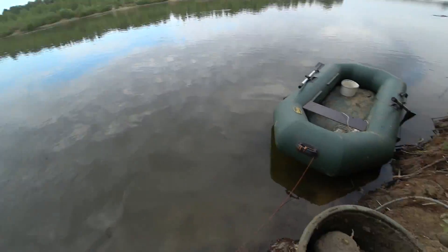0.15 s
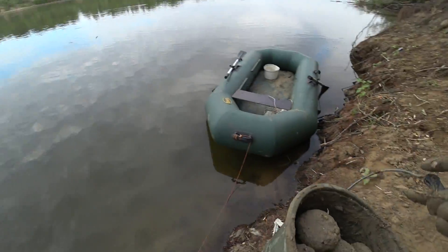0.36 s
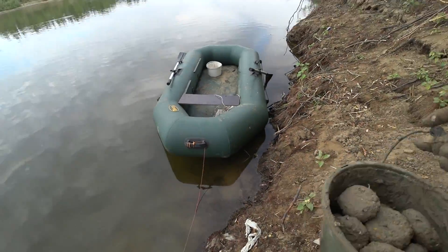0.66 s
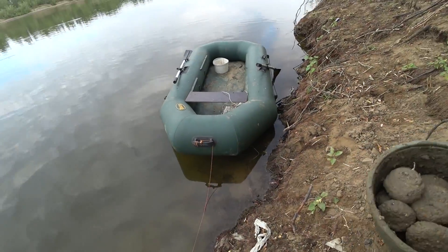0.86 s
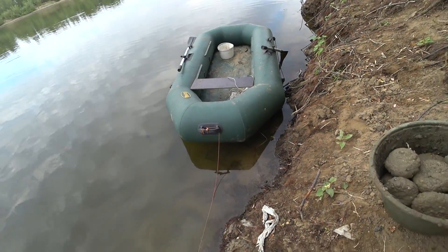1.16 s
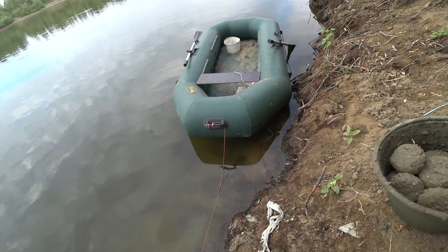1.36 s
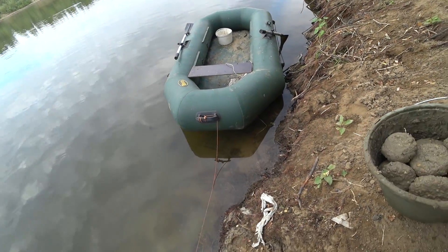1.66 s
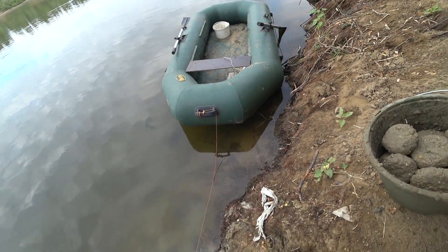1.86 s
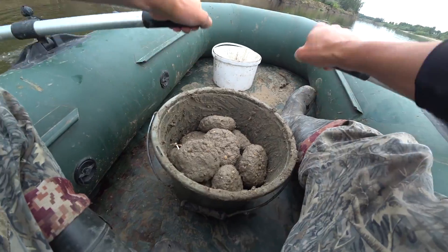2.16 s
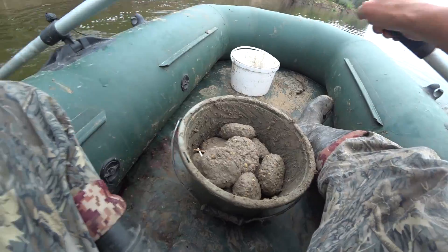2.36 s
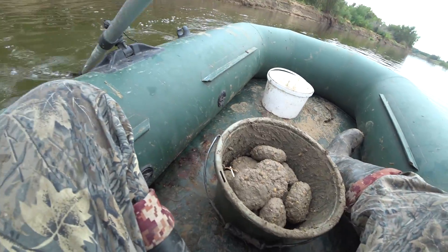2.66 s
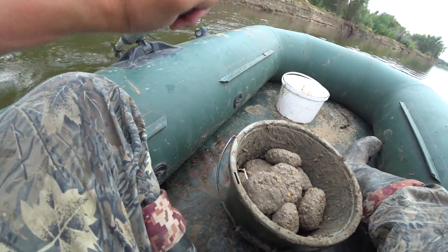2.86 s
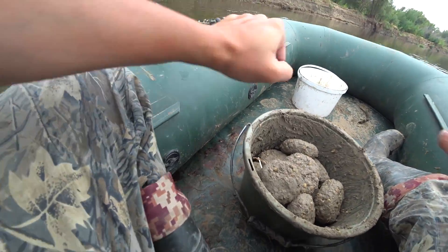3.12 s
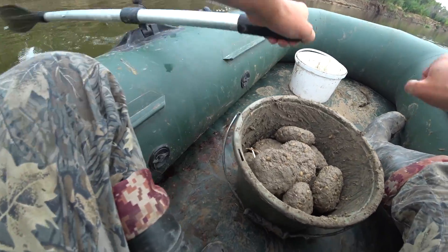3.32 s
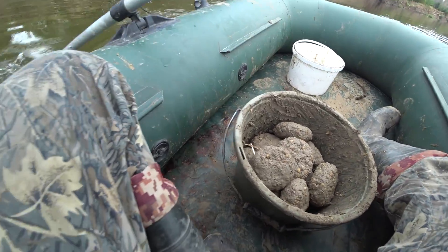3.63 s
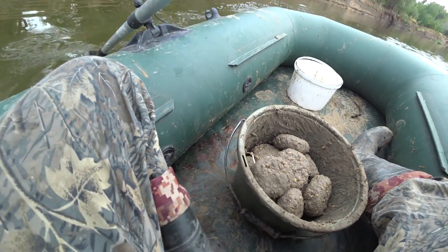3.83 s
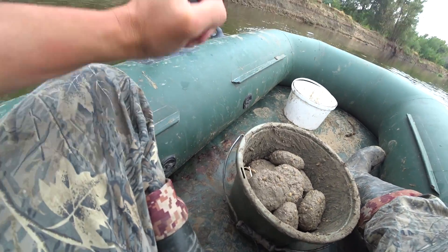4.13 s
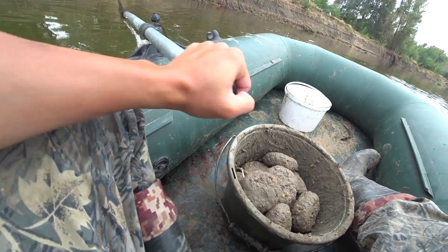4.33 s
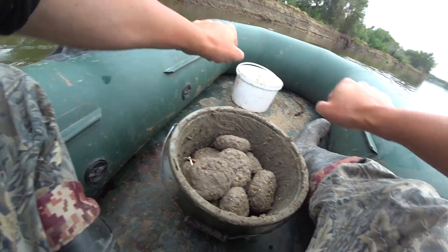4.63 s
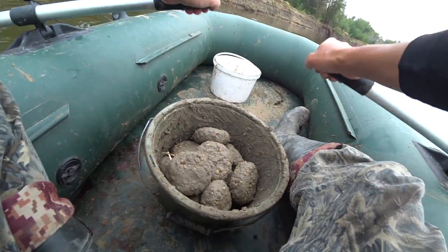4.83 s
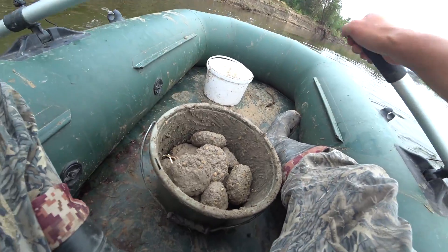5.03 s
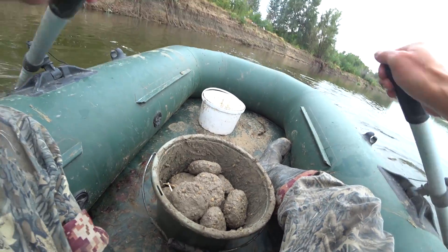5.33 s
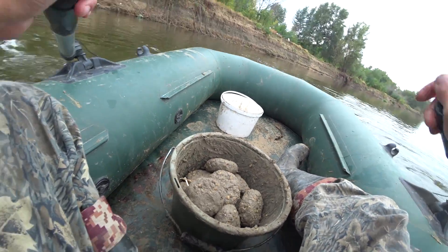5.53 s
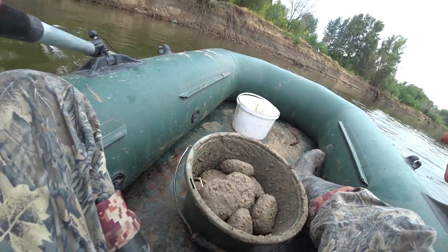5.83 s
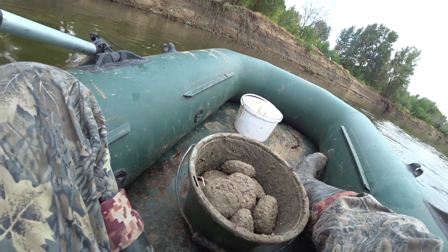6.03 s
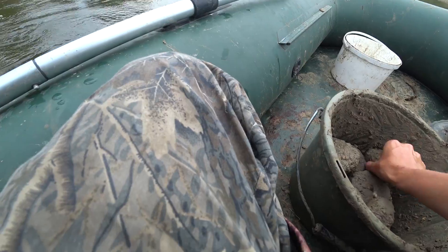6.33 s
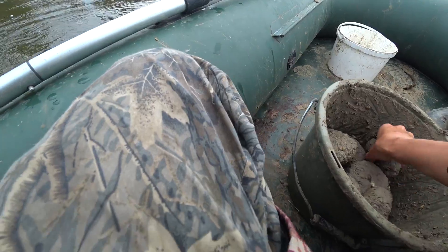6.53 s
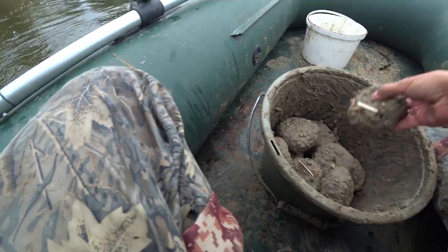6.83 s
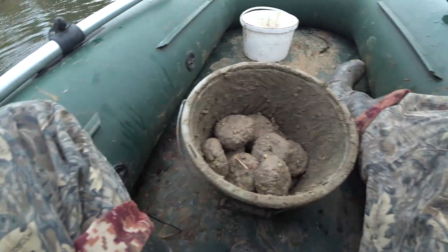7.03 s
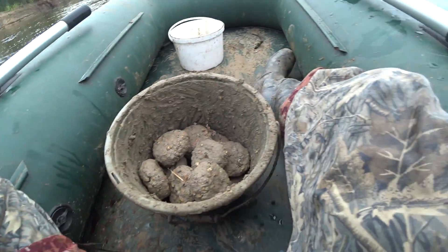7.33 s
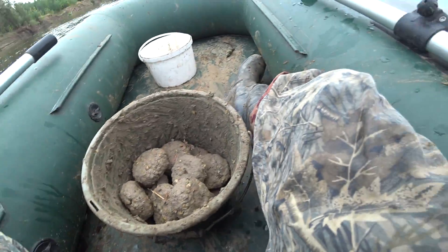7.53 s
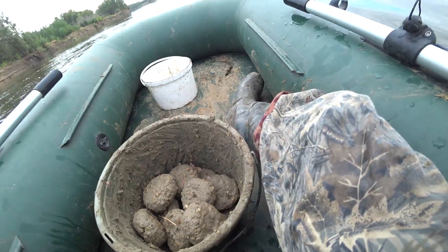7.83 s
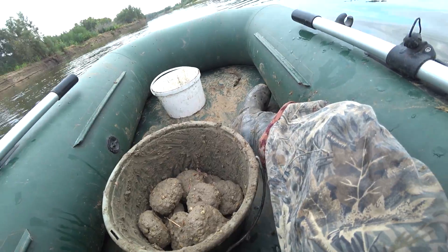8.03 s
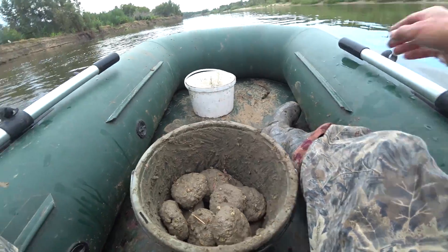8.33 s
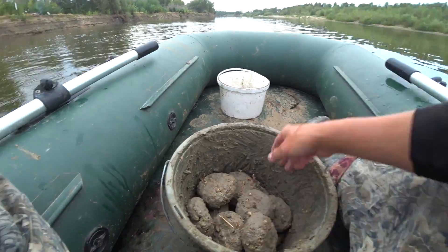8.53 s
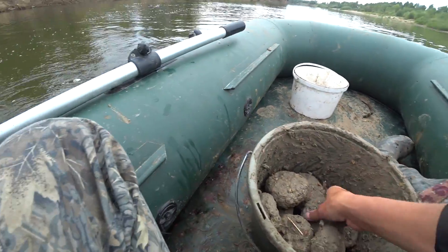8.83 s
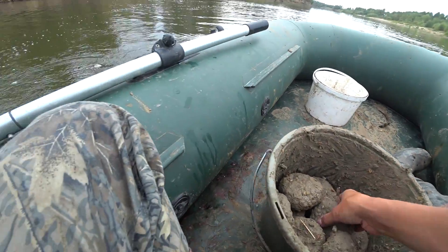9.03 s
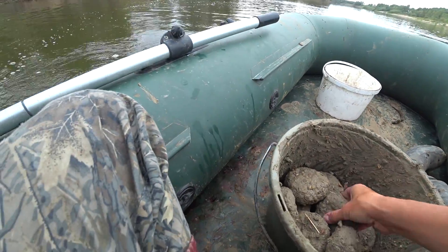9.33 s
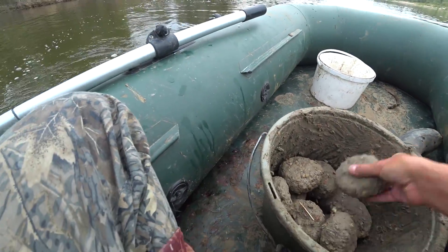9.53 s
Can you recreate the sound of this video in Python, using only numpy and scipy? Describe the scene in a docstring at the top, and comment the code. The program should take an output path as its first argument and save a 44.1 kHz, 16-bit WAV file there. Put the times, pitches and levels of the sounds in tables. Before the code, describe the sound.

A bait bucket knocks and scrapes on a quiet riverbank, then oars splash, gurgle and knock in a booming rubber boat.

```python
"""Oar blades splash and gurgle close by: shaped noise and swarms of tiny chirps swell with each stir.
It begins on a quiet bank, where a bait bucket is knocked and scraped, and goes on in a rubber boat.
Big bubbles are rising tones; drops and stiff cloth tick as very short rings with a snap of noise.
The aluminium oars ring and rattle in their locks, and the air-filled hull booms in low, damped tones.
Filtered noise makes the water under the floor, the rumble of wind and hull, the far river and the hiss."""
import sys
import numpy as np
from scipy import signal
from scipy.fft import rfft, irfft, next_fast_len
from scipy.io import wavfile
from scipy.ndimage import map_coordinates

SR = 44100
rng = np.random.default_rng(int(sys.argv[2]) if len(sys.argv) > 2 else 0)


def master(y):
    """Save y as 16-bit WAV."""
    cut = np.clip(np.atleast_2d(y).T, -1, 1)
    pcm = np.round(cut * 32767)  # scale
    wavfile.write(sys.argv[1], SR, pcm.astype(np.int16))


N = 426447  # length in samples


def amp(db):
    """Turn decibels into a plain multiplier."""
    return 10 ** (np.asarray(db) / 20)


def unit(x):
    """Scale a sound to an rms of 1."""
    return x / np.sqrt(np.mean(x ** 2) + 1e-20)


def along(points, hz):
    """Read a curve of (Hz, value) points on a log frequency axis."""
    f, value = np.transpose(points)
    return np.interp(np.log(hz + 1), np.log(f + 1), value)


def curves(rows):
    """Give one value per sample for each column after the time."""
    s, *columns = np.transpose(rows)
    return [np.interp(np.arange(N) / SR, s, column) for column in columns]


def wobble(rate):
    """A smooth random curve with so many random points a second."""
    points = rng.standard_normal(int(N * rate / SR) + 4)
    return map_coordinates(points, [np.arange(N) * rate / SR])


def between(span):
    """1 inside the (start, end) span in seconds, 0 outside, with soft edges."""
    t = np.arange(N) / SR
    return np.clip(np.minimum(t - span[0], span[1] - t) / 0.0039, 0, 1)


def filtered(x, response):
    """Multiply the spectrum of x by a function of frequency."""
    size = next_fast_len(N + 8192)
    return irfft(rfft(x, size) * response(np.fft.rfftfreq(size, 1 / SR)), size)[..., :N]


# How alike the two ears sound: f/Hz, likeness (1 = the same, 0 = unrelated)
EAR_LIKENESS = [(30, 0.88), (250, 0.94), (800, 0.08), (4000, 0.39), (10000, 0.72)]


def rush(spectrum):
    """Stereo noise of rms 1 with a given spectrum; the ears' likeness depends on frequency."""
    def mid_and_side(hz):
        turn = np.arccos(np.clip(along(EAR_LIKENESS, hz), -1, 1)) / 2
        return amp(along(spectrum, hz)) * [np.cos(turn), np.sin(turn)]
    mid, side = filtered(rng.standard_normal((2, N)), mid_and_side)
    return unit(np.array([mid + side, mid - side]))


def add(track, s, sound, side_db=0):
    """Lay a sound on the stereo track; the far ear hears it weaker and later."""
    for ear, sign in zip(track, (1, -1)):
        delay = max(0, -.3 * sign * side_db)  # samples
        part = ear[round(s * SR + delay):][:len(sound)]
        part += amp(sign * side_db / 2) * sound[:len(part)]


def ring(t, hz, t60, rise_ms):
    """A damped tone with a soft start; t60 is the time in s to fade by 60 dB."""
    return np.sin(2 * np.pi * hz * t) * amp(-60 * t / t60) * (1 - np.exp(-t * 1000 / rise_ms))


def puff(t, lo_hz, hi_hz, t60):
    """A burst of band noise that dies away."""
    hz = np.fft.rfftfreq(len(t), 1 / SR) + 1
    band = 1 / (1 + (lo_hz / hz) ** 3) / (1 + (hz / hi_hz) ** 3)
    noise = irfft(rfft(rng.standard_normal(len(t))) * band, len(t))
    return unit(noise) * amp(-60 * t / t60)


def grains(count, size, hz, spread, cycles, climb, scatter_db, wide_db):
    """Random damped sines whose pitch climbs, each on its own side; rms 1."""
    at = rng.random((count, 1))
    big = np.minimum(rng.exponential(size=(count, 1)), 4.5)
    pitch, side = rng.standard_normal((2, count, 1))
    n = np.arange(size)
    turns = np.clip(hz * np.exp(spread * pitch), 300, 14000) * n / SR
    u = turns / cycles
    tone = np.sin(2 * np.pi * turns * (1 + climb * u))
    wave = amp(scatter_db * big) * tone * u * np.exp(-3 * u) * (1 - n / size)
    ears = []
    for sign in (1, -1):
        where = (at * N + np.maximum(0, -1.4 * sign * side)).astype(int) + n  # one ear hears it later
        loud = wave * amp(sign * wide_db * side)
        ears.append(np.bincount(where.ravel(), loud.ravel(), N)[:N])
    return unit(np.array(ears))


# Side of the nearest stir: t/s, left minus right level/dB
SIDE = [(0, 0), (1, -4), (2, -3), (2.4, 3), (2.7, -4), (3.3, -1), (3.6, 3), (4.06, -4), (4.5, 1), (4.97, 3),
        (5.1, -4), (6, 0), (7.8, -2), (8, -5.5), (8.3, -5.5), (8.6, 0), (9.67, -2)]


def side_at(s):
    """How much louder the left ear is at a given time, in dB."""
    return np.interp(s, *np.transpose(SIDE))


# Blades in the water: from t/s, to t/s
ROWING_SPAN = (1.96, 6.15)


def rowing():
    """1 while the blades are in the water, else 0."""
    return between(ROWING_SPAN)


# The bucket scrapes: from t/s, to t/s
DRAGGING_SPAN = (0.83, 1.93)


def dragging():
    """1 while the bucket is dragged, else 0."""
    return between(DRAGGING_SPAN)


def stirred(calm_db, stirs, shape):
    """Level in dB: each stir rises fast out of the calm, sags while it lasts and dies away."""
    t, power = np.arange(N) / SR, amp(2 * calm_db)
    rise, sag, fall = shape
    for s, length, db in stirs:
        age = t - s
        before, after, past_end = np.minimum(age, 0), np.maximum(age, 0), np.maximum(age - length, 0)
        power = power + amp(2 * (db + rise * before - sag * after - fall * past_end))
    return 10 * np.log10(power)


# Quiet lapping between the stirs: t/s, gurgle level/dB, rustle level/dB
LAPPING = [(0, -59, -58.5), (.5, -63, -64.5), (1.02, -70, -80), (1.3, -56, -60.5), (1.94, -56, -73),
           (2, -53.5, -53.5), (2.9, -54.5, -62), (4.1, -54.5, -59), (5.4, -58, -62), (6.1, -56, -75),
           (6.6, -57, -56), (7.6, -54, -62), (8.4, -48, -58.5), (9.1, -58.5, -65.5), (9.67, -57, -65.5)]
# Blades churning and things rubbing on the rubber: start t/s, length t/s, gurgle level/dB
CHURNS = [(0.343, 0.14, -56), (1.134, 0.13, -48.5), (1.966, 0.074, -40), (2.378, 0.083, -40.5),
          (2.428, 0.11, -36), (2.998, 0.29, -42), (3.64, 0.14, -42.5), (3.861, 0.027, -49),
          (4.276, 0.31, -44.5), (4.992, 0.011, -46), (5.04, 0.19, -43.5), (5.623, 0.3, -50),
          (6.166, 0.214, -45), (6.689, 0.046, -52), (6.878, 0.53, -50), (7.764, 0.32, -45.5),
          (8.015, 0.12, -38.5), (8.25, 0.031, -53), (8.4, 0.43, -45)]
# Bursts of spray and sweeps of cloth: start t/s, length t/s, rustle level/dB
SPRAY_BURSTS = [(0, 0.11, -54), (0.356, 0.099, -52.5), (1.095, 0.16, -54), (1.97, 0.13, -59),
                (2.108, 0.008, -40), (2.352, 0.1, -37), (2.472, 0.14, -47.5), (3.032, 0.31, -52.5),
                (3.557, 0.19, -44.5), (3.775, 0.17, -52), (4.25, 0.8, -53), (4.747, 0.17, -54),
                (4.976, 0.17, -42.5), (5.058, 0.15, -49), (5.506, 0.64, -52.5), (6.21, 0.24, -54.5),
                (6.672, 0.087, -54), (6.913, 0.036, -46.5), (7.858, 0.12, -45), (8.015, 0.078, -46),
                (8.218, 0.063, -50.5), (8.327, 0.02, -48), (8.506, 0.35, -52), (8.902, 0.054, -55),
                (9.616, .1, -52.5)]
# How a stir rises, sags while it lasts, and falls on top of that after its end (all dB per s)
CHURN_SHAPE = (900, 24, 750)
SPRAY_SHAPE = (660, 13.7, 510)


def stir_levels():
    """Level curves in dB for the gurgle and the rustle."""
    gurgle_db, rustle_db = curves(LAPPING)
    return stirred(gurgle_db, CHURNS, CHURN_SHAPE), stirred(rustle_db, SPRAY_BURSTS, SPRAY_SHAPE)


# Foam noise: f/Hz, relative level/dB
FOAM_SPECTRUM = [(250, 0), (550, 6), (1000, 1), (2000, -7.5), (3500, -13.5), (6000, -30)]


def gurgle(wet, drag):
    """Foam noise: bubbles crowd it while rowing, and the bucket colours it while dragged."""
    bubbles = grains(count=8000, size=400, hz=1300, spread=.7, cycles=12, climb=.04,
                     scatter_db=3.1, wide_db=1.8)
    foam = unit(amp(2.75 * wobble(80)) * rush(FOAM_SPECTRUM))  # uneven grain of rubbing
    scrape = unit(filtered(foam, bucket_wall))
    return (1 - .4 * wet - .65 * drag) * foam + .85 * wet * bubbles + .95 * drag * scrape


# Fine spray noise: f/Hz, relative level/dB
SPRAY_SPECTRUM = [(1200, -3), (2300, 4), (4700, 1.5), (6600, 2.5), (9000, -8), (16000, -16)]


def spray(wet, drag, churn):
    """Flickering treble noise and tiny high chirps: fine spray and cloth."""
    crackle = grains(count=2600, size=120, hz=5750, spread=0.356, cycles=8.8, climb=0.08,
                     scatter_db=1.5, wide_db=-0.2)
    flicker_db = (1.5 + 0.3 * wet) * churn + 2.08 * wobble(70)
    return unit(amp(flicker_db) * (0.85 * rush(SPRAY_SPECTRUM) + (.6 - 0.57 * drag) * crackle))


def water(gurgle_db, rustle_db):
    """Gurgle below, spray and cloth above, with faint stray ticks, all moving from side to side."""
    churn, wet, drag = wobble(25), rowing(), dragging()
    snaps = grains(count=350, size=60, hz=8000, spread=0.26, cycles=1.8, climb=.05,
                   scatter_db=1.0, wide_db=5.0)
    near = amp(-74) * (1 - drag) * snaps
    near = near + amp(gurgle_db + 0.35 * churn) * gurgle(wet, drag)
    near = near + amp(rustle_db) * spray(wet, drag, churn)
    side_db = side_at(np.arange(N) / SR)
    return near * amp([side_db / 2, -side_db / 2])


# Large bubbles: t/s, level/dB, start f/Hz, end pitch over start pitch
LARGE_BUBBLES = [(2.677, -42.5, 950, 1.9), (2.727, -40.5, 960, 1.1), (2.985, -41.5, 710, 1.5),
                 (3.021, -35.5, 495, 1.4), (3.069, -36, 445, 1.03), (3.619, -28.5, 1947, 1.35),
                 (3.725, -42, 1396, 1.3), (3.766, -35.5, 2570, 1.3), (3.78, -46, 650, 1.05),
                 (3.844, -37.5, 2170, 1.6), (3.864, -36.5, 2340, 2), (3.853, -36.5, 1037, 1.33),
                 (4.195, -45, 1910, 1.5), (4.237, -38.5, 1910, 1.24), (4.26, -41.5, 405, 2.1),
                 (4.324, -39, 523, 1.34), (4.395, -45, 536, 0.86), (4.412, -47, 870, 1.15),
                 (4.452, -40, 780, 1.6), (4.487, -45, 784, 1.06), (4.61, -54, 986, 2.3),
                 (5.078, -41.5, 519, 2.6), (5.116, -33.5, 917, 1.1), (5.25, -47.5, 950, 0.97),
                 (5.282, -38.5, 834, 1.26), (5.4, -44, 768, 1.3), (5.496, -47.5, 1210, 3),
                 (5.695, -42.5, 297, 5.1), (5.83, -46, 694, 0.97), (8.14, -39, 734, 1.36)]


def big_bubbles():
    """A bubble's pitch glides faster and faster, mostly upward, as it nears the surface."""
    out = np.zeros((2, N))
    for s, db, hz, ratio in LARGE_BUBBLES:
        life = 22 * ratio ** 0.32 / hz  # s: so many cycles, and longer for a far climb
        u = np.arange(round(life * SR)) / (life * SR)
        shiver = np.interp(u, np.linspace(0, 1, 9), 1 + .3 * rng.standard_normal(9))  # uneven loudness
        phase = 2 * np.pi * np.cumsum(hz * ratio ** (u ** 1.6)) / SR
        swell = np.sin(np.pi * np.sqrt(u))
        add(out, s, amp(db) * np.sin(phase) * swell * shiver, -2.2)
    return out


# Drops and cloth snaps: t/s, level/dB, f/Hz
DROPS_AND_SNAPS = [(0.4719, -27.5, 5150), (1.7779, -30.5, 5950), (2.0625, -26, 2620), (2.321, -27, 5700),
                   (2.744, -28.5, 6060), (2.782, -35.5, 6300), (3.012, -33.5, 3470), (3.16, -26, 6850),
                   (3.2905, -15.5, 5830), (3.5924, -24, 5230), (3.7372, -27, 3160), (3.8306, -21.5, 3900),
                   (3.883, -30.5, 6900), (4.062, -31.5, 5200), (4.2656, -36, 2770), (4.296, -47, 3600),
                   (4.328, -34, 3670), (4.4143, -36, 3960), (4.4876, -34.5, 2760), (4.533, -33, 3840),
                   (5.104, -19, 5530), (5.1184, -8.5, 6070), (5.188, -27, 5200), (5.311, -35.5, 5000),
                   (5.5218, -29, 5700), (5.842, -36, 3450), (5.876, -40, 2700), (6.025, -36, 3530),
                   (6.0572, -37.5, 2260), (6.384, -33, 6500), (6.537, -35, 5940), (6.5892, -37, 9500),
                   (6.6826, -30.5, 6570), (6.7198, -23, 7300), (7.9343, -27, 3500), (7.9675, -22.5, 4670),
                   (7.9887, -32.5, 2600), (8.026, -28, 5500), (8.032, -20, 2550), (8.075, -31, 4100),
                   (8.1193, -29, 5100), (8.2481, -23.5, 5340), (8.26, -39, 4220), (8.3654, -32.5, 4930),
                   (8.5913, -25.5, 7050), (8.843, -34, 5400), (8.8814, -40, 9500), (8.9043, -39.5, 5500),
                   (8.943, -30.5, 10000), (9.0255, -36, 7200), (9.1249, -36.5, 6700), (9.2265, -38.5, 5540),
                   (9.3363, -42, 12400), (9.4374, -35, 6500), (9.4813, -36.5, 8500), (9.5169, -43, 6500),
                   (9.538, -40, 6040)]


def ticks():
    """Each tick is a few cycles of tone on a dry, broad snap with a short fizz."""
    out, t = np.zeros((2, N)), np.arange(SR // 25) / SR
    for s, db, hz in DROPS_AND_SNAPS:
        snap = 1.8 * ring(t, hz, 14 / hz, .15) + .6 * puff(t, 3000, 8000, .0045)
        fizz = 0.029 * puff(t, 6400, 13000, 0.046)
        add(out, s, amp(db) * (snap + fizz), side_at(s))
    return out


# Oar shaft against its lock: t/s, level/dB, f/Hz, relative rattle level/dB
OAR_KNOCKS = [(1.965, -27, 560, -42), (3.621, -19, 376, -2), (4.968, -26.5, 960, 3), (4.988, -14, 930, -59),
              (6.72, -34, 348, -8), (7.874, -22.5, 312, 0), (7.901, -26, 293, 4), (8.002, -26, 750, -29),
              (8.019, -23, 780, -5), (8.027, -10, 904, -6), (8.037, -19, 820, 7), (8.074, -19, 825, -13),
              (8.104, -31.5, 945, -14), (8.261, -32.5, 820, -17)]


def knocks():
    """The hollow shaft rings briefly and roughly; the loose lock rattles with it."""
    out, t = np.zeros((2, N)), np.arange(SR // 8) / SR
    for s, db, hz, rattle_db in OAR_KNOCKS:
        shaft = 1.45 * ring(t, hz, 0.021, 0.4)
        rough = .24 * puff(t, 600, 1200, .08)
        chatter = np.interp(t, np.linspace(0, t[-1], 40), rng.exponential(size=40))  # uneven contacts
        rattle = amp(rattle_db - 13) * chatter * puff(t, 2600, 5900, 0.034)
        add(out, s, amp(db) * (shaft + rough + rattle), side_at(s))
    return out


# Blows on the hull and ground: t/s, level/dB, boom f/Hz, relative slap level/dB
SOFT_BLOWS = [(0.052, -21.5, 118.6, 0), (0.081, -28, 163, -0.5), (0.474, -41.5, 174, 10.5),
              (1.055, -18, 299.5, 4), (1.059, -30, 94, -18), (1.965, -17, 137, -1), (1.99, -18, 179, -27),
              (2.145, -19, 100, -10), (2.212, -22, 133.5, -12), (2.258, -20.5, 94.6, -5),
              (2.874, -33, 112, -9), (3.146, -24.5, 133, -16), (3.241, -25, 92, -30),
              (3.399, -24, 71.6, -13), (3.513, -20.5, 148.7, -45), (4.291, -26, 83.6, -22),
              (4.49, -25, 127, -26), (4.661, -33, 86, -6), (4.732, -33.5, 178, -32), (5, -24.5, 198, -28),
              (6.166, -28.5, 84, -7), (6.199, -23.5, 90.5, -19), (7.318, -35.5, 166, 9.5),
              (7.355, -36.5, 165, 12.5), (7.533, -29.5, 112, -18), (7.873, -16, 133.4, 1.5),
              (9.149, -34.5, 124, -2)]


def thuds():
    """A soft blow: the air tube booms at a low pitch and two higher ones, under a dull slap."""
    out, t = np.zeros((2, N)), np.arange(SR // 5) / SR
    for s, db, hz, slap_db in SOFT_BLOWS:
        boom = 1.28 * ring(t, hz, 0.094, 2.65)
        boom += 0.56 * ring(t, 1.757 * hz, 0.066, 1.0)
        boom += 0.14 * ring(t, 2.99 * hz, 0.12, 0.84)
        slap = amp(slap_db - 7.0) * puff(t, 114, 1270, 0.057)
        add(out, s, amp(db) * (boom + slap), -.8)
    return out


# Ways the bucket wall rings: f/Hz, relative level/dB, time to fade by 60 dB t/s
BUCKET_MODES = [(350, 0, .07), (730, -2, .09), (1080, -8, .04), (1330, -15, .04)]


def bucket_wall(f):
    """How the bucket's modes, each 60 Hz wide, colour the friction; a little passes unchanged."""
    response = 0.41
    for hz, db, _ in BUCKET_MODES:
        response = response + amp(db) * 1j * f * 60 / (hz * hz - f * f + 1j * f * 60)
    return response


# Blows on the bucket: t/s, level/dB, relative level of upper modes/dB, relative clack level/dB
BUCKET_BLOWS = [(1.043, -22, -4, -7), (1.058, -6.5, -18, -21), (1.067, -41, -28, 8), (1.224, -39.5, 8, -11),
                (1.489, -45.5, 2, -2.5), (1.554, -40, -26.5, -36), (1.585, -42, -20, -30),
                (1.668, -43, 3, -10), (1.833, -35, -10, -33)]


def bucket():
    """Sharper blows reach the upper modes of the plastic wall and clack; damp bait makes them uneven."""
    out, t = np.zeros((2, N)), np.arange(SR // 4) / SR
    (low_hz, _, low_t60), *upper = BUCKET_MODES
    for s, db, sharp_db, clack_db in BUCKET_BLOWS:
        wall = ring(t, low_hz, low_t60, 3.5)
        for hz, level, t60 in upper:
            uneven = np.interp(t, np.linspace(0, t[-1], 60), 1 + .6 * rng.standard_normal(60))
            wall = wall + amp(level + sharp_db) * uneven * ring(t, hz, t60, 1.5)
        clack = amp(clack_db - 3.5) * puff(t, 380, 5700, 0.043)
        add(out, s, amp(db) * (wall + clack), -2.5)
    return out


def nearby(x):
    """Short scattered echoes off hull, legs and water."""
    t = np.arange(SR // 10) / SR
    tail = np.array([puff(t, 870, 10000, 0.016), puff(t, 2600, 14500, 0.027)])
    late = np.pad(x, ((0, 0), (90, 0)))  # echoes start 90 samples later
    return signal.fftconvolve(late, tail / np.linalg.norm(tail[0]), axes=1)[:, :N]


# Wind and hull rumble over time: t/s, level/dB
RUMBLE_LEVEL = [(0, -57.5), (1.94, -67.5), (1.97, -31.5), (2.29, -33.5), (2.36, -38.5), (2.8, -47.5),
                (3.04, -50.5), (3.2, -35.5), (3.45, -30.5), (3.65, -39), (4.12, -44.5), (4.34, -41.5),
                (4.77, -36.5), (5.2, -41), (5.4, -38.5), (5.6, -46.5), (6.66, -52.5), (7.13, -38),
                (7.26, -55), (7.46, -45.5), (8.3, -54), (8.42, -41.5), (8.92, -51.5), (9.67, -55.5)]


def rumble_curve():
    """The rumble's level in dB at every sample."""
    return curves(RUMBLE_LEVEL)[0]


# Slosh noise: f/Hz, relative level/dB
SLOSH_SPECTRUM = [(70, -11.5), (130, 1), (200, 0.5), (350, 0), (600, -10), (1200, -50)]


def slosh(gurgle_db):
    """Water under the floor: it swells with both the hull's motion and the stir at the blades."""
    level_db = .3 * rumble_curve() + .7 * gurgle_db
    afloat = 0.55 + 0.12 * between((ROWING_SPAN[0], N / SR + 1))  # louder once rowing has begun
    lumps_db = 2.2 * wobble(11) + 3 * wobble(30)
    return afloat * amp(level_db + 1.0) * unit(amp(lumps_db) * rush(SLOSH_SPECTRUM))


# Rumble noise: f/Hz, relative level/dB
RUMBLE_SPECTRUM = [(15, 0.5), (70, 1), (119, -8), (200, -14.5), (300, -59)]


def rumble():
    """Lumpy low noise of wind and hull."""
    return amp(rumble_curve()) * unit(amp(3.2 * wobble(21)) * rush(RUMBLE_SPECTRUM))


# Far river and microphone hiss: f/Hz, relative level/dB
AIR_SPECTRUM = [(18, -43), (30, -15), (43, -34), (632, -25), (6720, -34), (8740, -43.5), (9970, -35.5),
                (16000, -42)]


def air():
    """Steady noise of the far river and the microphone, at -63 dB rms."""
    return amp(-63) * rush(AIR_SPECTRUM)


def scene():
    """Mix all the sounds; the short hits also get nearby echoes."""
    hits = big_bubbles() + ticks() + knocks() + bucket()
    gurgle_db, rustle_db = stir_levels()
    foreground = water(gurgle_db, rustle_db) + hits + amp(-7.0) * nearby(hits) + thuds()
    return foreground + slosh(gurgle_db) + rumble() + air()


def record(dry):
    """Keep nothing above the microphone's band limit of 15900 Hz."""
    return filtered(dry, lambda hz: hz < 15900)


dry = scene()
out = record(dry)
master(out)
```